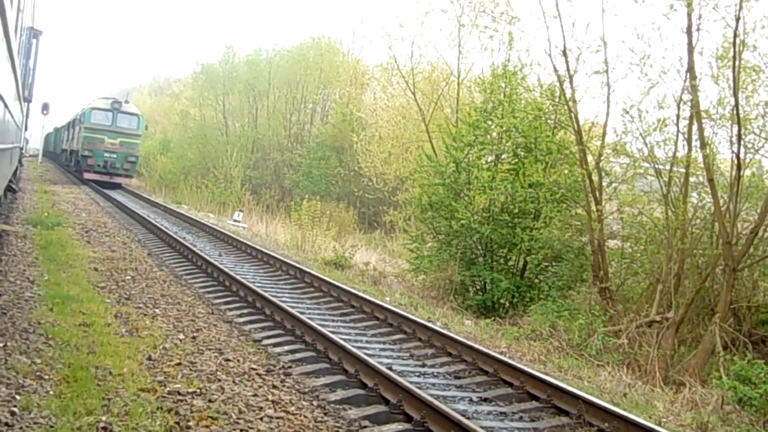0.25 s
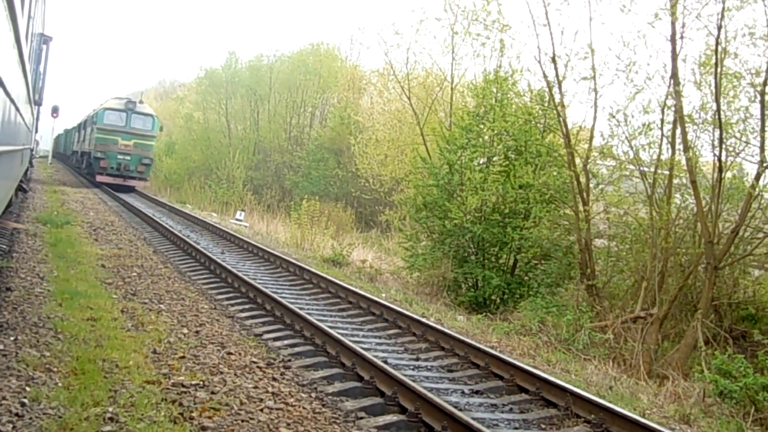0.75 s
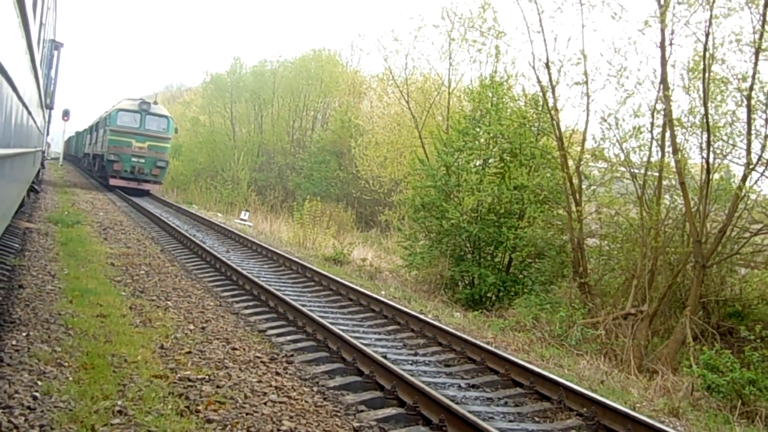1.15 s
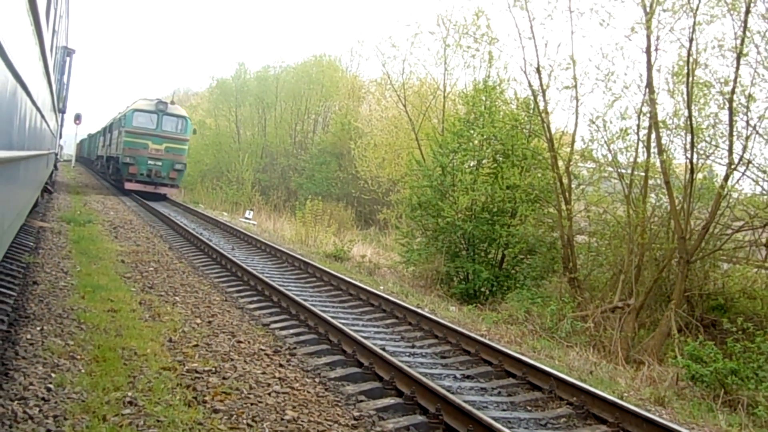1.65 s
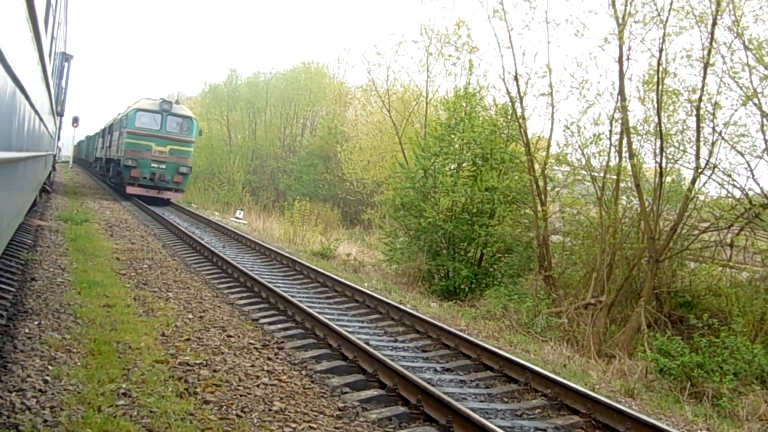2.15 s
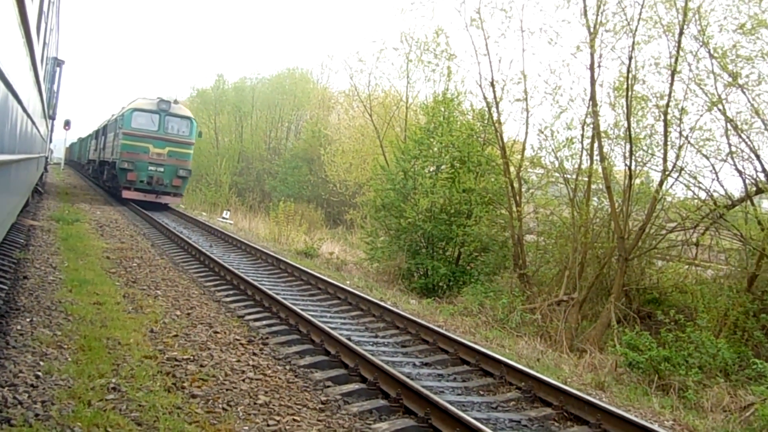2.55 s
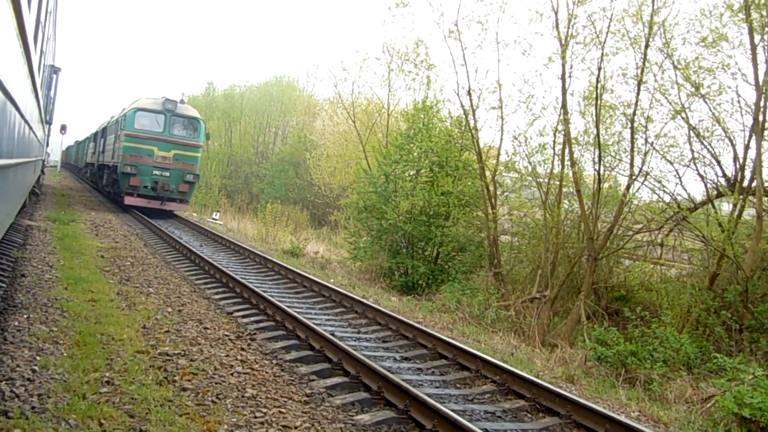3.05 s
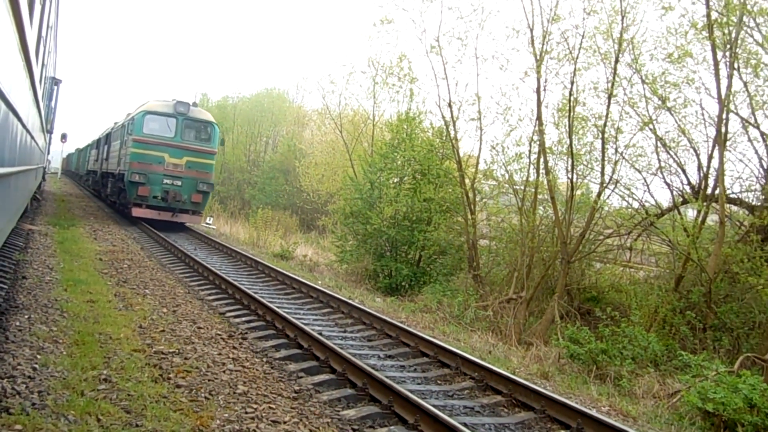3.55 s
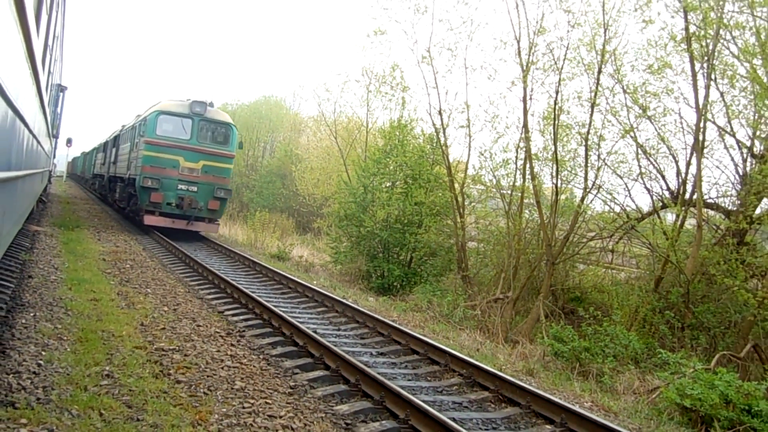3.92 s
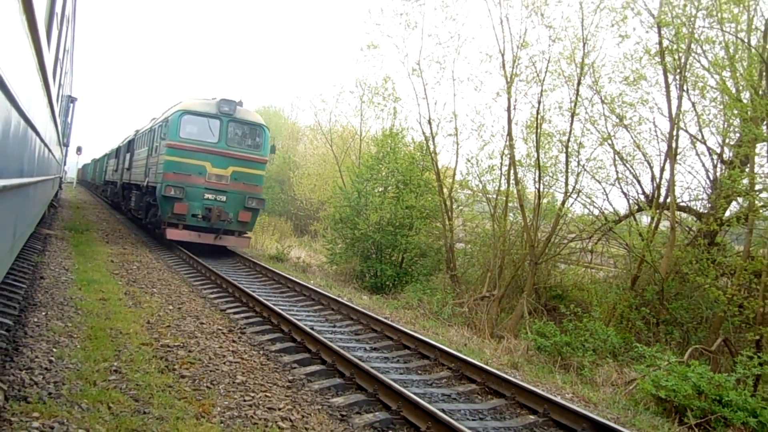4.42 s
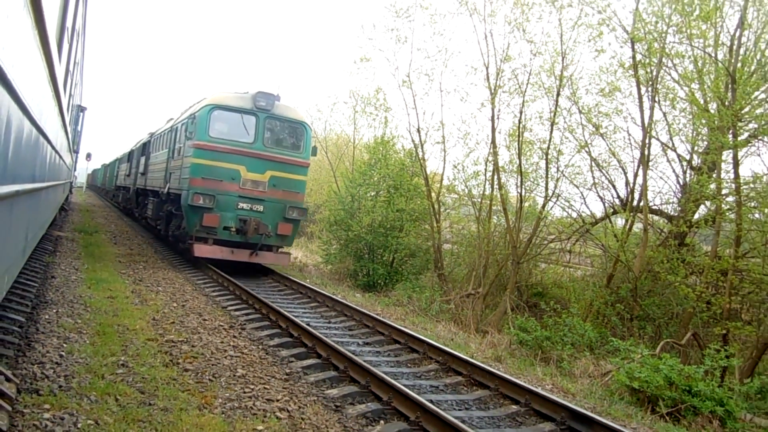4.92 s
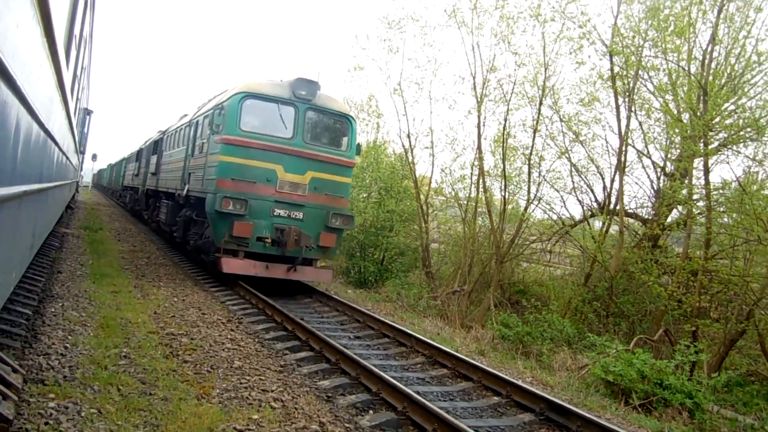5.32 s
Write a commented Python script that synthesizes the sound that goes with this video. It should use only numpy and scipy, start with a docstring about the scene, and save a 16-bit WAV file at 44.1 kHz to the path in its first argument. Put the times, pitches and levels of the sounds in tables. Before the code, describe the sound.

Outdoors beside a track, two deep diesel engines throb together, their booms swelling and sinking about once a second. Almost at once a short, hoarse air whistle toots and lingers in the trees. Exhaust roar and rolling wheel noise grow as the train nears; rails zing faintly, then more brightly around two and five seconds. A thin gear whine emerges after four seconds. Close stereo microphones at the trackside.

```python
"""Two diesel engines boom in and out of step as a twin-unit locomotive draws a freight train nearer.
Around them are a growing exhaust roar, a blower drone, a thin gear whine and the noise of the wheels.
The rails carry a hiss ahead of the train, and zing as the axles cross each joint.
There are a few faint, very short puffs of treble noise, and the air whistle toots once into the trees.
Engines, whine and whistle are built from sines; gas, wheels, rails, air and puffs from coloured noise."""
import sys
import numpy as np
from scipy import signal
from scipy.fft import rfft, irfft
from scipy.io import wavfile
from scipy.ndimage import uniform_filter1d

SR = 44100
rng = np.random.default_rng(int(sys.argv[2]) if len(sys.argv) > 2 else 0)


def persist_wave(psi):
    """Save psi, clipped to +-1, as 16-bit WAV."""
    counts = np.round(np.clip(psi, -1, 1) * 32767).astype(np.int16)
    wavfile.write(sys.argv[1], SR, np.atleast_2d(counts).T)


N = 246060
T, HZ = np.arange(N) / SR, np.fft.rfftfreq(N, 1 / SR)
CRANK_HZ = 6.78  # turns a second of the rear engine
EDGE_HZ = 13600  # upper limit of the sound
# the front of the train: distance at the start, speed toward the listener
START_M, SPEED_M_PER_S = 69.4, 9.06
# the front unit clears the trees: middle and length of that moment
OPEN_S, OPENING_S = 4.28, 0.17


def gain_of(db):
    """Decibels to amplitude."""
    return 10 ** (np.asarray(db) / 20)


def evened(x):
    """Scales a sound to rms 1."""
    return x / np.sqrt(np.mean(x ** 2) + 1e-20)


def read(points, hz=HZ):
    """Reads a table of frequencies and values, joined on a log frequency axis."""
    f, value = np.transpose(points)
    return np.interp(np.log(hz + 1), np.log(f + 1), value)


def colour(points):
    """Gain of a spectrum that falls steeply beyond the ends of its table."""
    low_end = np.minimum(HZ / points[0][0], 1)
    high_end = np.minimum(points[-1][0] / (HZ + 1), 1)
    return gain_of(read(points)) * (low_end * high_end) ** 6


def drift(rate):
    """Smooth random wandering of rms 1, with up to about rate changes a second."""
    raw = rfft(rng.standard_normal(4096))
    hz = HZ[:len(raw)]
    slow = raw * np.exp(-(hz / rate) ** 2) * (hz > 0)
    wander = evened(irfft(slow))
    return np.interp(T, np.linspace(0, T[-1], len(wander)), wander)


# how alike left and right are: pitch_hz, likeness (0-1)
LEFT_RIGHT_LIKENESS = [(100, 1), (300, 0.98), (650, 0.98), (1100, 0.86), (2200, 0.64), (4000, 0.14),
                       (6500, 0.34), (9000, 0.092), (13000, .25)]


def noise(shape):
    """Coloured stereo noise, alike in the bass and more diffuse in the treble."""
    a, b = rfft(rng.standard_normal((2, N)))
    same = np.clip(read(LEFT_RIGHT_LIKENESS), -1, 1)
    other = same * a + np.sqrt(1 - same ** 2) * b
    return evened(irfft(np.array([a, other]) * shape, N))


def tone(turns):
    """A sine of rms 1, given its phase in turns."""
    return np.sqrt(2) * np.cos(2 * np.pi * turns)


def patchy(x, db, frames=12, bins=7):
    """Lets patches of the spectrum swell and fade on their own, by db on average (rms)."""
    z = signal.stft(x, nperseg=1024, noverlap=768)[2]
    field = uniform_filter1d(rng.standard_normal(z.shape[1:]), bins, axis=0)
    field = evened(uniform_filter1d(field, frames, axis=1))
    back = signal.istft(z * gain_of(db * field), nperseg=1024, noverlap=768)[1]
    return evened(back[:, :N])


def resonances(modes):
    """Gain that a set of resonances adds to a flat response."""
    return sum((gain_of(db) - 1) / (1 + (2 * (HZ - hz) / width) ** 2) for hz, width, db in modes)


def distance():
    """Metres to the front of the train."""
    return np.maximum(START_M - SPEED_M_PER_S * T, 5)


def step(at_s, db, length_s):
    """Gain that changes smoothly by db around a moment."""
    return gain_of(db * (.5 + .5 * np.tanh((T - at_s) / (2 * length_s))))


def approach(db, growth, open_db=0):
    """Gain of a source: db at the start, a power (growth) of nearness, a step as the front clears the trees."""
    nearness = START_M / distance()
    return gain_of(db) * nearness ** growth * step(OPEN_S, open_db, OPENING_S)


# the front engine gains about one beat a second on the rear one
# moments when they are out of step: time_s
OUT_OF_STEP = [-.55, .42, 1.35, 2.33, 3.23, 4.3, 5.28, 6.25]


def cranks():
    """Turns made by the rear and the front crankshaft; one beat is a sixth of a turn."""
    rear = CRANK_HZ * T
    beats_gained = np.interp(T, OUT_OF_STEP, np.arange(len(OUT_OF_STEP)) + .5)
    return rear, rear + beats_gained / 6


# unequal cylinders add other tones: crank_order (cycles per crank turn), level_db
CRANK_ORDERS = [(3, -52), (4, -49), (5, -36), (8, -34.5), (9, -31.5), (10, -39), (12, -41), (15, -40),
                (17, -45), (18, -43), (20, -45), (22, -60), (34, -49)]
# the two exhaust booms; the front unit comes to screen the rear one: time_s, rear_level_db, front_level_db
BOOM_LEVELS = [(0, -19, -29), (1.35, -16.5, -23.5), (1.85, -14, -29), (2.8, -20.5, -17),
               (3.7, -13.5, -15.5), (4.7, -19, -15.5), (5.25, -25, -10.5), (5.58, -19, -13.5)]
# rear, then front unit: throb_db, lope_depth (0-1), first_lope_s, first_thump_s, first_chug_s
ENGINE_UNITS = [(0, .18, .14, .11, .09), (-7, .28, .056, .022, .075)]


def engines(throb_growth=0.12, waver_db=1.6, scatter_turns=0.57, boom_waver_db=0.45,
            chug_db=-37.5, chug_growth=0.35, chug_hz=170, chug_width_hz=11):
    """Two booms, six beats a crank turn; unequal cylinders lope and thump, a chug a turn rings the pipe."""
    times, *levels = np.transpose(BOOM_LEVELS)
    pipe = {order: np.exp(-((order * CRANK_HZ - chug_hz) / chug_width_hz) ** 2)
            for order in range(21, 30)}
    boom, throb = np.zeros(N), np.zeros(N)
    for turns, level_db, unit in zip(cranks(), levels, ENGINE_UNITS):
        engine_db, lope, lope_s, thump_s, chug_s = unit

        lurch = 1 + lope * np.cos(2 * np.pi * (turns - lope_s * CRANK_HZ))
        boom_db = np.interp(T, times, level_db) + boom_waver_db * drift(7)
        boom += gain_of(boom_db) * lurch * tone(6 * turns)

        chug_turns = turns - chug_s * CRANK_HZ
        chug = evened(sum(weight * tone(order * chug_turns) for order, weight in pipe.items()))
        throb += approach(chug_db + engine_db, chug_growth) * chug

        thump_turns = turns - thump_s * CRANK_HZ
        for order, db in CRANK_ORDERS:
            order_gain = gain_of(db + engine_db + waver_db * drift(1.2))
            throb += order_gain * tone(order * thump_turns + scatter_turns * rng.random())
    return boom + approach(0, throb_growth) * throb


# colour of the low rumble: pitch_hz, level_db
RUMBLE_COLOUR = [(6, -13), (16, -23), (35, -25), (60, 0.5), (80, -1.5), (110, 1.5), (135, -18), (148, -4.5),
                 (170, -7), (181, -4.5), (192, -27), (260, -24)]
# colour of the roar: pitch_hz, level_db
ROAR_COLOUR = [(185, -6), (210, -11), (260, -8.5), (320, -8.5), (470, -9.5), (620, -11.5), (705, -13),
               (800, -9.5), (980, -15.5), (1250, -20), (1400, -23.5)]
# resonances of the exhaust stacks: pitch_hz, width_hz, level_over_roar_db
STACK_MODES = [(224, 9, 11.5), (281, 22, 3.5), (386, 38, 7), (424, 22, 5), (627, 25, 5.5), (835, 10, -8.5)]
# how strongly the stacks are heard: time_s, share of their ringing
STACK_SHARE = [(0, 0.43), (2.05, 0.22), (2.25, 0.4), (3.5, 0.58), (3.95, 0.66), (5.58, 0.78)]


def exhaust(rumble_db=-38, rumble_growth=1.09, puff_depth=0.05, patchy_db=0.7,
            top_db=-33.5, top_growth=0.8, top_step_s=2.0, top_step_db=1.0, top_step_length_s=0.041,
            body_hz=335, body_db=-33.0, body_growth=0.49, body_near_s=5.23, body_near_db=10.5):
    """Turbulent gas: a low rumble, and a roar that puffs with the firing and rings the stacks."""
    rumble = approach(rumble_db, rumble_growth) * noise(colour(RUMBLE_COLOUR))
    gas = patchy(noise(colour(ROAR_COLOUR)), patchy_db)
    ring = irfft(rfft(gas) * resonances(STACK_MODES), N)
    ring = ring * np.interp(T, *np.transpose(STACK_SHARE))
    puffs = 1 + puff_depth * np.cos(2 * np.pi * 6 * cranks()[0])  # in time with the rear engine
    roar = evened(gas + ring) * puffs
    # the body is the low part of the roar and swells close by; the top steps up once
    body = irfft(rfft(roar) / (1 + (HZ / body_hz) ** 10), N)
    top = roar - body
    top = top * approach(top_db, top_growth) * step(top_step_s, top_step_db, top_step_length_s)
    body = body * approach(body_db, body_growth) * step(body_near_s, body_near_db, 0.45)
    return rumble + top + body


def machinery(drone_hz=180, drone_db=-46, drone_growth=1.52, drone_open_db=7, drone_waver=0.0028,
              whine_hz=1200, whine_db=-58, whine_growth=0.9, whine_open_s=4.23, whine_open_db=10,
              whine_opening_s=0.14, whine_waver=0.0009, flutter_db=-1.1,
              octave_db=-58, octave_growth=0.97, octave_open_s=5.0, octave_open_db=7,
              octave_flutter_db=2.8, smear_db=-56, smear_growth=1.2, smear_width_hz=90):
    """A blower drone; a thin gear whine grows a little, then comes out clearly within about half a second."""
    drone_turns = np.cumsum(drone_hz * (1 + drone_waver * drift(1.7))) / SR
    drone = approach(drone_db, drone_growth, drone_open_db) * tone(drone_turns)

    teeth = np.cumsum(whine_hz * (1 + whine_waver * drift(17))) / SR
    whine = approach(whine_db, whine_growth) * step(whine_open_s, whine_open_db, whine_opening_s)
    whine = whine * gain_of(flutter_db * drift(3.7)) * tone(teeth)

    # the whine's octave stands on a band of noise
    octave = approach(octave_db, octave_growth) * step(octave_open_s, octave_open_db, whine_opening_s)
    octave = octave * gain_of(octave_flutter_db * drift(5)) * tone(2 * teeth)
    band = 1 / (1 + ((HZ - 2 * whine_hz) / smear_width_hz) ** 2)
    smear = approach(smear_db, smear_growth) * noise(band)
    return drone + whine + octave + smear


# colour of the rolling noise: pitch_hz, level_db
WHEEL_COLOUR = [(650, -33), (1100, -6), (1180, -14), (1270, -9), (1690, -7), (1900, -9.5), (2390, -8),
                (2630, -9.5), (3870, -13), (6280, -14.5), (7740, -13), (9250, -19.5), (10100, -18.5),
                (11500, -24), (13500, -25.5)]


def wheels(level_db=-38.0, growth=0.58, patchy_db=1.52):
    """Rolling noise of the whole train: patchy coloured noise that grows as it nears."""
    return approach(level_db, growth) * patchy(noise(colour(WHEEL_COLOUR)), patchy_db)


# the first axle meets a joint at JOINT_S; joints come evenly, each nearer, louder and brighter
JOINT_S, JOINT_EVERY_S = 2.22, 2.902
JOINT_STEP_DB, JOINT_BRIGHTER_DB = 7, 11.5
ZING_T60_S, ZING_T60_HZ = 0.92, 9900  # time to fade by 60 dB at that pitch; lower zings die sooner
# colour of the rail hiss: pitch_hz, level_db
RAIL_COLOUR = [(2800, -32), (3500, -5), (4200, -6.5), (6000, 2.5), (7500, 5.5), (8700, 0.5), (9500, 4.5),
               (10700, -3), (11300, -27), (13500, -18)]
# ringing of the rail steel: pitch_hz, width_hz, level_over_hiss_db
STEEL_MODES = [(3460, 310, 25), (7200, 63, -1), (7860, 62, 9), (8070, 81, 15), (8700, 87, 9),
               (9260, 360, 5.5), (9790, 160, 12.5), (10880, 130, 11)]
# zings at one joint: after_first_axle_s, level_db, rise_s, brightest_hz, spread_hz
AXLE_ZINGS = [(0, -31.5, 0.008, 9040, 1800), (.005, -50, .025, 13100, 700), (.01, -39, 0.021, 4800, 900),
              (.04, -41.5, 0.025, 7850, 300), (.14, -51, 0.028, 10200, 200), (.24, -39, 0.036, 7300, 900),
              (.3, -49, .03, 9780, 200), (.51, -38, 0.042, 10200, 600), (1.29, -39, 0.026, 10700, 700),
              (1.33, -42.5, 0.016, 7800, 250), (1.499, -43, 0.024, 10300, 400),
              (1.57, -42.5, 0.0098, 10800, 200), (1.575, -43, 0.013, 6940, 120),
              (1.91, -47, 0.017, 10700, 400), (1.95, -54, .02, 7600, 400), (2.08, -50, 0.022, 10900, 350),
              (2.13, -46, 0.024, 7300, 400), (2.43, -47, .03, 9800, 400), (2.71, -45, 0.017, 9750, 400)]


def rails(hiss_db=-13, loss_db_per_m=1.0, steady_ring=0.084, shimmer_db=3, grain_db=1.8, stutter_db=1.7):
    """Steel carries wheel noise ahead of the train: a hiss that fades by the metre, and zings at joints."""
    ring, steel = resonances(STEEL_MODES), colour(RAIL_COLOUR)
    hiss = patchy(noise(steel * (1 + steady_ring * ring)), shimmer_db)
    out = gain_of(hiss_db - loss_db_per_m * distance()) * hiss
    singing = patchy(noise(steel * (1 + ring)), grain_db, frames=4, bins=4)
    singing = singing * gain_of(stutter_db * drift(45))

    t, band = np.arange(SR) / SR, np.fft.rfftfreq(SR, 1 / SR)  # each zing is cut off after a second
    treble = np.interp(band, [8000, 9500], [0, 1])  # the part of a zing that the rail loses first
    for joint in (-1, 0, 1):
        for after, db, rise, hz, spread in AXLE_ZINGS:
            start = round((JOINT_S + joint * JOINT_EVERY_S + after) * SR)
            if 0 <= start < N:
                # each wheel favours its own part of the rail's spectrum
                bite = rfft(singing[:, start:start + SR], SR) / (1 + ((band - hz) / spread) ** 2)
                bite *= gain_of(joint * JOINT_BRIGHTER_DB * treble)
                zing = evened(irfft(bite, SR)[:, :N - start])
                t60 = ZING_T60_S * hz / ZING_T60_HZ
                fade_db = -60 * np.maximum(t - rise, 0) / t60
                swell = np.minimum(t / rise, 1) * gain_of(db + joint * JOINT_STEP_DB + fade_db)
                out[:, start:start + SR] += zing * swell[:N - start]
    return out


# faint short bursts of treble noise: peak_s, level_db
BURST_TIMES = [(.277, -45), (.54, -38), (.666, -37), (1.04, -45), (1.092, -40), (1.265, -45), (1.415, -44),
               (1.662, -40), (1.708, -41), (2.44, -41)]


def treble_bursts(low_hz=6000, decay_s=0.004):
    """Brief treble noise that swells and dies within milliseconds around each peak."""
    envelope = sum(gain_of(db) * np.exp(-abs(T - s) / decay_s) for s, db in BURST_TIMES)
    return envelope * noise(colour([(low_hz, 0), (9500, 0), (EDGE_HZ, -4)]))


# how long the echo rings: pitch_hz, time to fade by 60 dB (s)
ECHO_TIMES = [(300, 1.6), (700, 1.9), (2000, 3.5), (3500, 2.6), (12000, 0.34)]


def trees(x):
    """Diffuse echo of the wood and the wall, a second of fading noise; the highest treble dies first."""
    hz, t, z = signal.stft(rng.standard_normal((2, SR)), SR, nperseg=256)
    fade = gain_of(-60 * t / read(ECHO_TIMES, hz)[:, None])
    tail = signal.istft(z * fade, SR, nperseg=256)[1]
    return signal.fftconvolve(x[None], tail / np.linalg.norm(tail[0]), axes=1)[:, :N]


# the valve opens, blows a little weaker and weaker, and shuts
TOOT_S, TOOT_RISE_S, TOOT_HOLD_S, TOOT_T60_S = .362, 0.075, 0.06, 1.8
TOOT_DB, TOOT_FADE_DB_PER_S = -37, 18
TOOT_HZ, TOOT_SHARP, TOOT_SETTLE_S = 689, .08, .07  # it starts sharp (a share) and sags to its pitch
# partials of the note: harmonic, level_db, extra_fade_db_per_s
WHISTLE_PARTIALS = [(1, -4, -3), (3, -4.5, 5), (4, -6, -6), (5, 3.5, 62), (6, -8, -3), (7, 0, 35),
                    (8, -14, 3), (9, -7, -9), (10, -10, -5)]
# colour of the rushing air: pitch_hz, level_db
AIR_COLOUR = [(1800, -14), (3450, 3), (4000, -6), (6000, -1.5), (8000, -1), (9700, -1.5), (11200, -14),
              (13500, -17)]


def whistle(rough=0.021, flicker_db=3, air_db=-31.5, air_peak_s=.456, air_swell_s=0.064, air_fall_s=0.15,
            echo_db=-11, air_echo_db=-9, far_db=-3, far_rise_s=0.061, far_t60_s=7, far_flicker_db=1.8):
    """A short, hoarse, sagging toot in a rush of air; its lowest note lingers in the wood."""
    age = np.maximum(T - TOOT_S, 0)
    since = np.maximum(age - TOOT_RISE_S, 0)
    pitch = TOOT_HZ * (1 + TOOT_SHARP * np.exp(-age / TOOT_SETTLE_S))
    turns = np.cumsum(pitch * (1 + rough * drift(160))) / SR  # quick pitch wobble makes it hoarse
    fade_db = -TOOT_FADE_DB_PER_S * since - 60 * np.maximum(since - TOOT_HOLD_S, 0) / TOOT_T60_S
    blow = np.minimum(age / TOOT_RISE_S, 1) ** 2 * gain_of(TOOT_DB + fade_db)
    note = np.zeros(N)
    for harmonic, db, extra_fade in WHISTLE_PARTIALS:
        partial_db = db - extra_fade * since + flicker_db * drift(40)
        note += blow * gain_of(partial_db) * tone(harmonic * turns)

    before, after = np.minimum(T - air_peak_s, 0), np.maximum(T - air_peak_s, 0)
    rush = np.exp(-(before / air_swell_s) ** 2 - after / air_fall_s)
    air = rush * gain_of(air_db) * noise(colour(AIR_COLOUR))

    linger = np.minimum(since / far_rise_s, 1) * gain_of(TOOT_DB + far_db - 60 * since / far_t60_s)
    far_turns = np.cumsum(TOOT_HZ + 5 * drift(39)) / SR
    far_echo = linger * gain_of(far_flicker_db * drift(7.1)) * tone(far_turns)
    near_echo = trees(gain_of(echo_db) * note + gain_of(air_echo_db) * air[0])
    return note + air + far_echo + near_echo


def scene():
    """The whole train, heard from beside the track."""
    return engines() + exhaust() + machinery() + wheels() + rails() + treble_bursts() + whistle()


def levelled(x, threshold_db=-16, share=0.21, follow_s=0.0094):
    """Gain control: each swell above the threshold pushes the whole sound down a little."""
    keep = np.exp(-1 / (follow_s * SR))
    power = signal.lfilter([1 - keep], [1, -keep], np.mean(x ** 2, axis=0))
    power_db = 10 * np.log10(power + 1e-12)
    return x * gain_of(-share * np.maximum(power_db - threshold_db, 0))


# how much louder the left microphone is: pitch_hz, left_over_right_db
LEFT_LOUDER = [(40, 3), (62, 4), (140, -.2), (300, -1), (650, -2.5), (1100, -2), (2200, -1.4), (4500, -0.8),
               (6500, -2), (8000, 1), (8700, 15), (10000, 12), (11500, 1.5), (13500, 3)]
# how far the left microphone leads: pitch_hz, lead (radians)
LEFT_LEAD = [(40, -.41), (90, -.35), (300, -.15), (650, 0), (1100, .26), (2200, .3), (4000, 1.6),
             (6500, 2.9), (7700, 4.7), (10500, 6.5)]


def record(dry):
    """Two microphones that differ in colour and phase; then gain control and the upper band limit."""
    halves = [.5, -.5]  # half of each difference goes to either side
    lean = gain_of(np.outer(halves, read(LEFT_LOUDER)))
    lean = lean / np.sqrt(np.mean(lean ** 2, axis=0))
    lead = np.exp(1j * np.outer(halves, read(LEFT_LEAD)))
    heard = levelled(irfft(rfft(dry) * lead * lean, N))
    low_pass = signal.firwin(511, EDGE_HZ, window=("kaiser", 9), fs=SR)
    return signal.oaconvolve(heard, low_pass[None], "same")


dry = scene()
out = record(dry)
persist_wave(out)
```